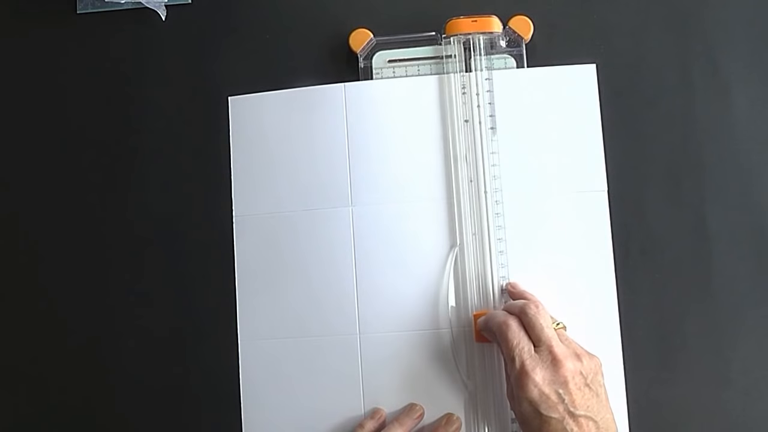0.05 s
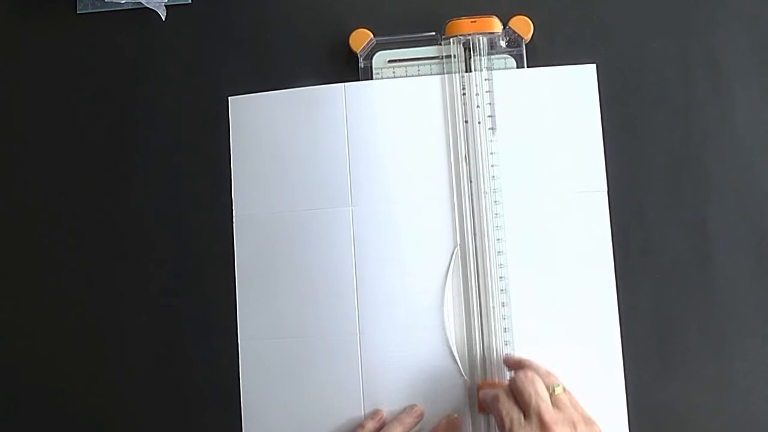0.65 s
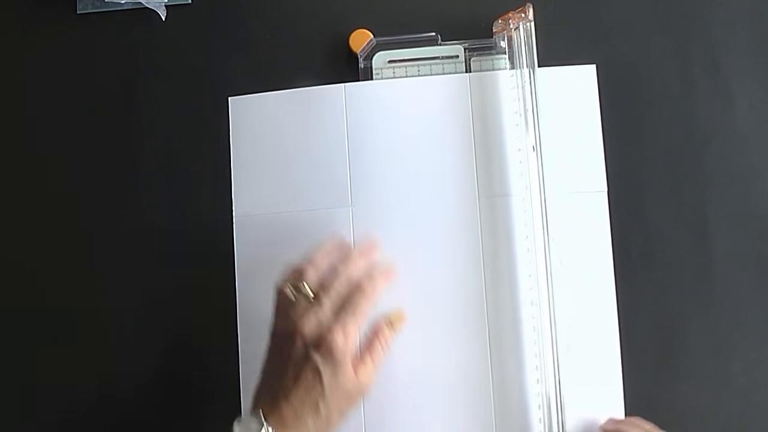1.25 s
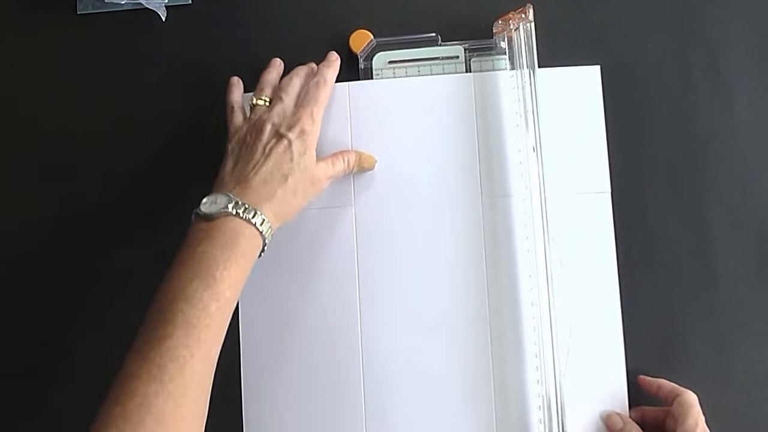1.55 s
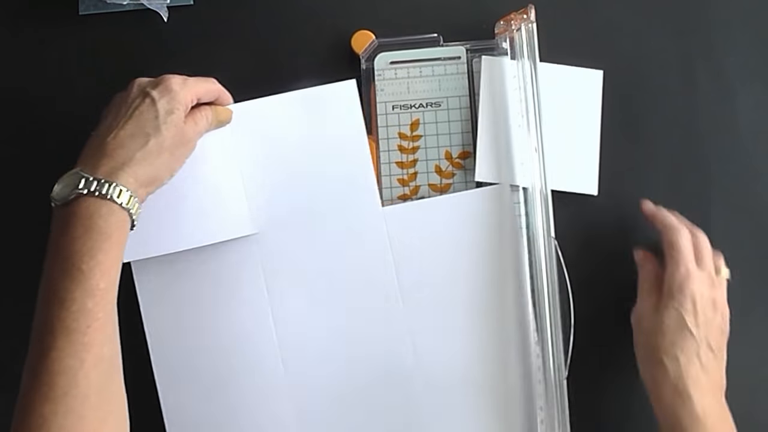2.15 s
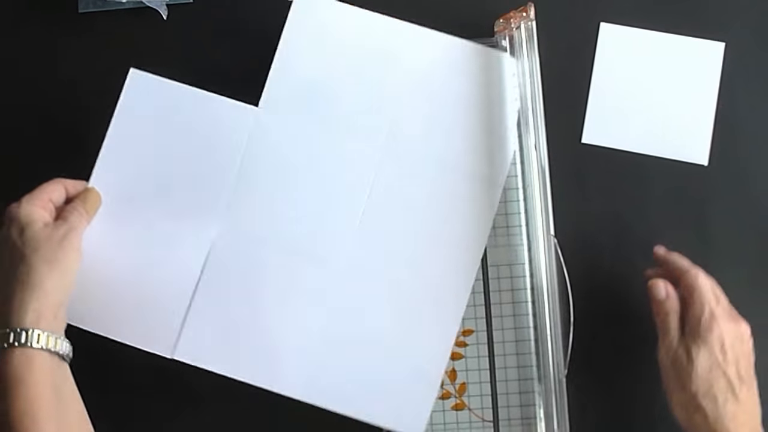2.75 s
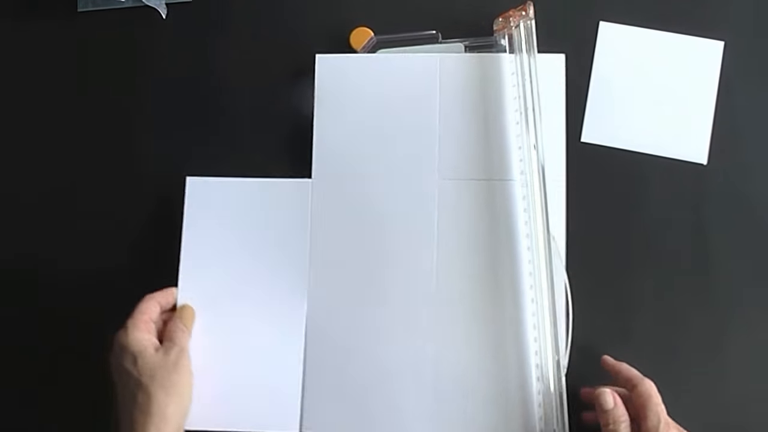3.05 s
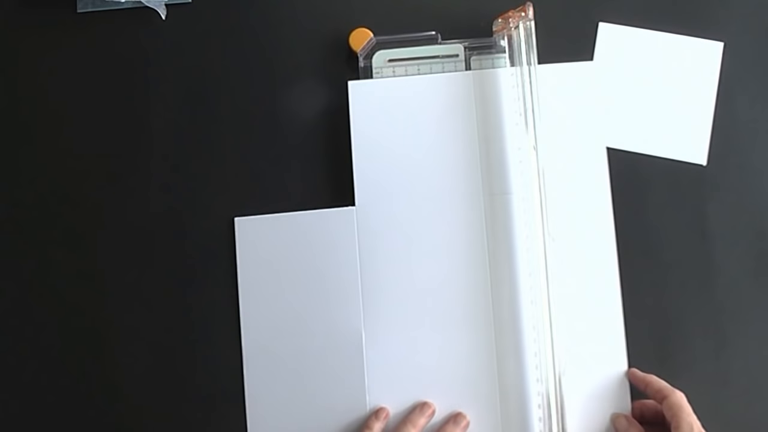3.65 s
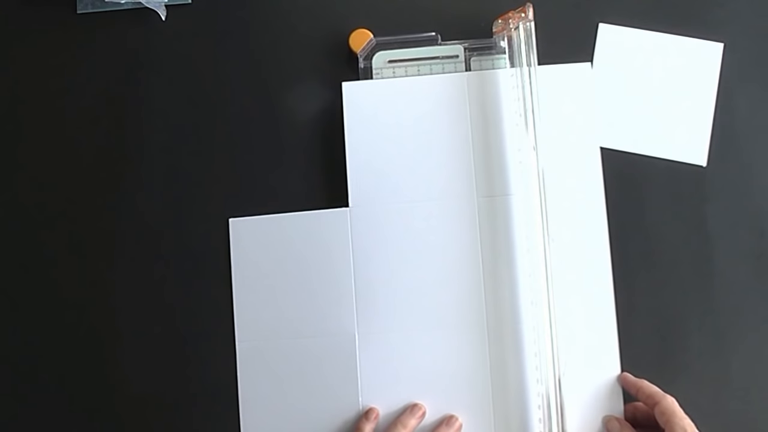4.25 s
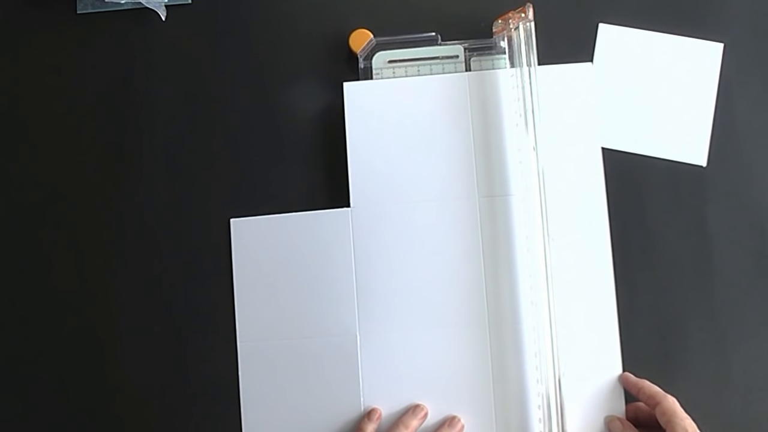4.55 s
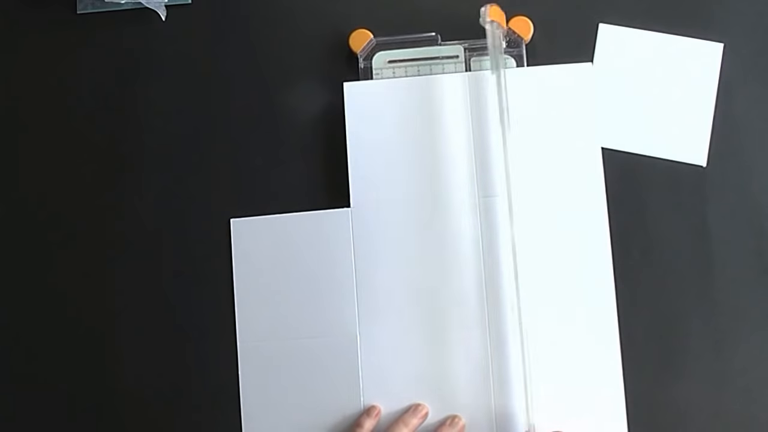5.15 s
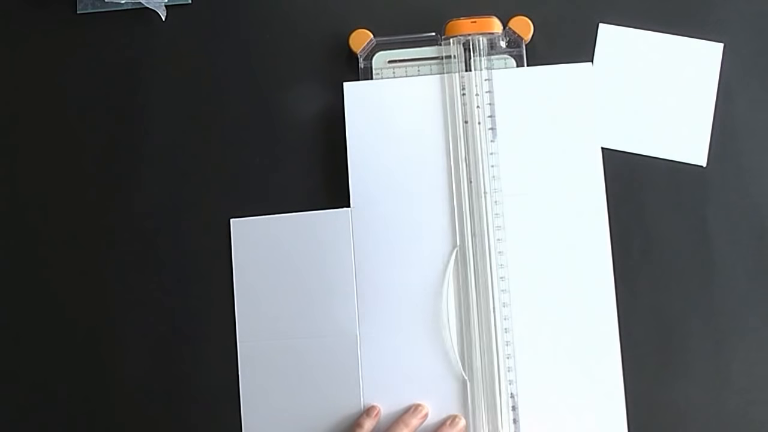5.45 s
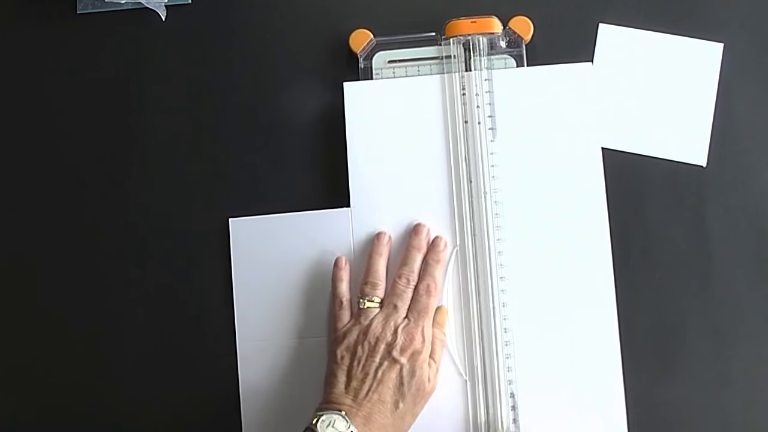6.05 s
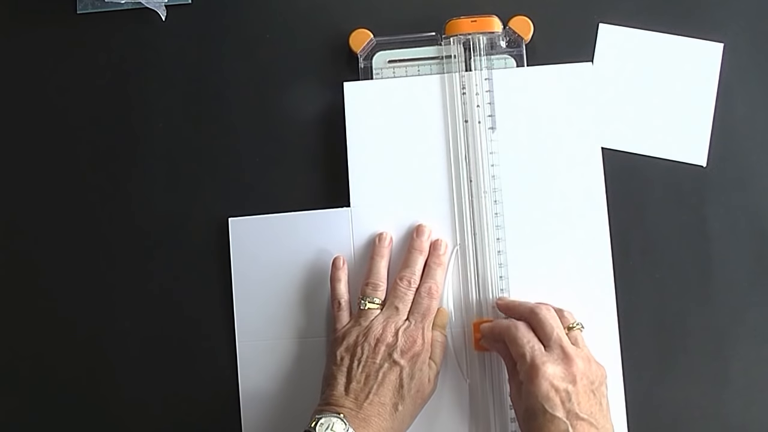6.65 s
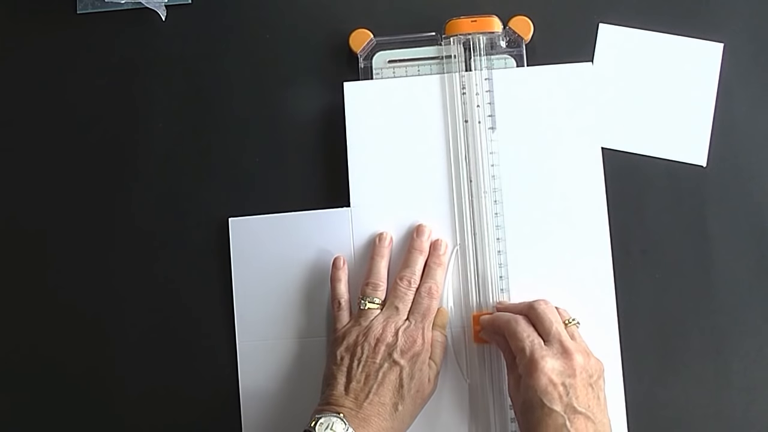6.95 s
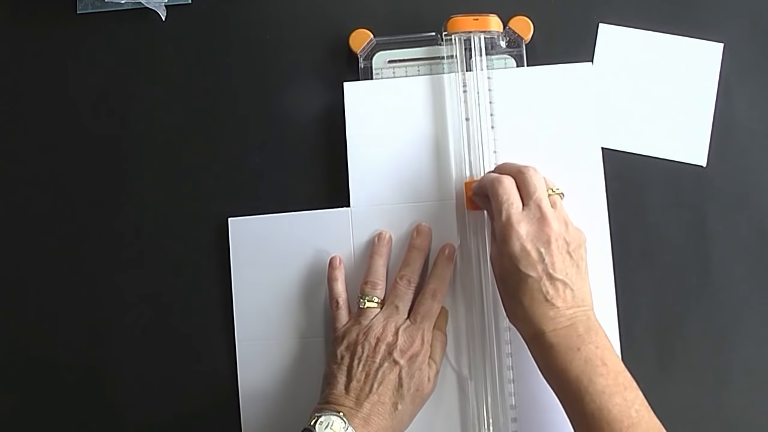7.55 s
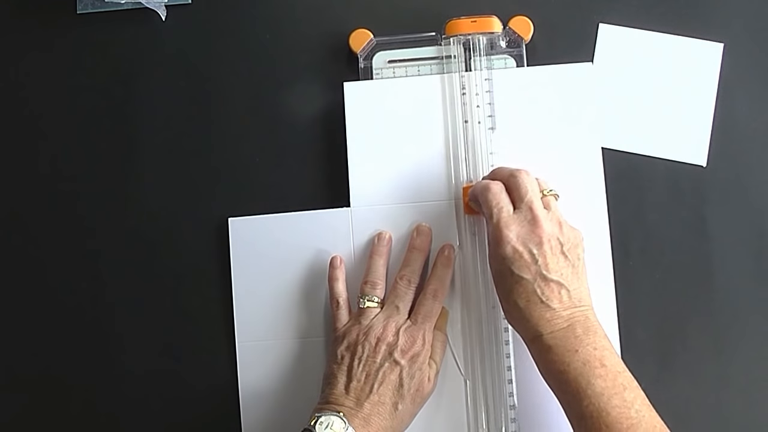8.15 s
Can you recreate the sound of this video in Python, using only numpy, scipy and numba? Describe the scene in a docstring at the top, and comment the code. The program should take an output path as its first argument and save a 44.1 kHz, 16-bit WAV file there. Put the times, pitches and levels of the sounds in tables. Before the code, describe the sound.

A plastic paper trimmer clacks and rasps through card twice, with the card rustling and slapping as it is turned between cuts.

```python
"""A plastic paper trimmer cutting card on a table in a small room, stereo microphone close overhead.
The rail clacks down, ringing the base, and the blade rasps through: snapping fibres hiss and shake the rail.
The rail is lifted; the card rubs, slaps and crackles as it is slid, flexed and turned. The rail shuts
again and a second cut follows in short strokes. Short reflections and faint room tone lie behind."""
import sys
import numpy as np
from scipy import signal
from scipy.fft import rfft, irfft
from scipy.io import wavfile
from scipy.ndimage import uniform_filter1d, map_coordinates
from numba import njit

SR = 44100
rng = np.random.default_rng(int(sys.argv[2]) if len(sys.argv) > 2 else 0)


def digitize_waveform(pressure):
    """Quantize a signal to 16-bit integers and store it at the path in sys.argv[1].

    Rows of a 2-D input are taken as channels; values are limited to [-1, 1].
    """
    field = np.atleast_2d(pressure).T
    bounded = np.clip(field, -1, 1)
    quanta = np.round(bounded * 32767).astype(np.int16)
    wavfile.write(sys.argv[1], SR, quanta)


N = 366471
TIME = np.arange(N) / SR
AGE = TIME[:SR // 3]  # seconds since a hit
THUD_BELOW_HZ = 350  # base modes below this thud, the rest ring

# modes of the trimmer's base: f/Hz, level/dB, t60/s
BASE_MODES = [(152, -16, 0.19), (239, -13.5, 0.21), (306, -12, 0.21), (405, -22, 0.1), (478, -11, 0.1),
              (580, 6, .058), (808, -8, .09), (1137, -10.5, 0.09), (1245, -22, .12), (1495, -28, 0.15),
              (1690, -29, 0.2), (2145, -26, 0.08)]
# spectrum of the card's body: f/Hz, level/dB
CARD_BODY = [(76, -59), (130, -19), (238, -6), (397, -10.5), (464, -2.5), (527, -18), (592, -5.5),
             (816, 1.5), (964, -7), (1280, -5.5), (1900, -14.5), (2150, -12), (2700, -24), (3640, -72),
             (6160, -120)]
# spectrum of the card's surface: f/Hz, level/dB
CARD_HISS = [(300, -38), (1410, -10), (2400, -4.5), (2680, -7), (4150, 0.5), (5750, -3.5), (7900, -5.5),
             (9500, -9.5), (11700, -13), (15100, -24)]


def blade():
    """Fibres part in dense snaps that hiss and shake the rail; snagging bundles make the rasp pulse."""
    # resonances of the rail: f/Hz, width/Hz, level/dB
    rail_modes = [(233, 26.6, -5), (403, 120, -13), (613, 47.6, 2.5), (807, 112, -3), (1654, 140, -7),
                  (2158, 68, -7.5)]
    # spectrum of parting fibres: f/Hz, level/dB
    fibre_spectrum = [(1290, -33.5), (2200, -3.5), (2490, -7), (2970, -7), (3390, -2.5), (4610, -1),
                      (5000, -1), (7150, -5.5), (8510, -8.5), (9560, -10.5), (10700, -12), (14800, -19),
                      (16000, -46.5)]
    # resonances of the thin blade: f/Hz, width/Hz, gain over the plain hiss
    blade_song = [(5300, 500, .7), (8400, 500, .8), (10900, 700, 1.6)]
    slow_hz, fast_hz, snag_s = 1080, 1430, 0.0037
    rasp, hiss, speed = strokes()
    snaps = grains(per_s=9000, spread_db=-0.2)
    snags = signal.oaconvolve(slips(per_s=55, uneven=.6), np.exp(-AGE / snag_s))[:N]
    drag = unit(snaps * (1 + undb(-1.5) * snags))
    rail = sum((-1) ** k * undb(db) * resonate(drag, hz, width)
               for k, (hz, width, db) in enumerate(rail_modes))
    whirr = glide(drag, slow_hz + (fast_hz - slow_hz) * speed, width=150.)  # card round the blade
    rail = colour(rail + undb(2) * whirr, [(70, -7), (150, 0), (2100, -12.5), (2700, -17), (8000, -39)])
    fibres = colour(snaps + .5 * drag, fibre_spectrum)
    song = sum(gain * glide(fibres, hz * (1 + 0.037 * walk(11)), float(width))
               for hz, width, gain in blade_song)  # the pitches wander as the blade flexes
    return undb(-0.7) * rasp * unit(rail) + undb(1.5) * hiss * flutter(fibres + song, rate=39)


def strokes():
    """Gains of rasp and hiss, and blade speed 0-1: each stroke swells towards its fast middle."""
    # blade strokes: t/s, attack/s, hold/s, release/s, rasp/dB, hiss/dB
    cuts = [(0.532, 0.048, 0.26, 0.049, -35, -43), (6.191, 0.021, 0.24, 0.15, -34, -41),
            (6.643, .12, 0.016, 0.12, -45.5, -52), (6.868, 0.12, .01, 0.058, -59.5, -61.5),
            (7.268, 0.17, 0.13, 0.09, -48.5, -56), (7.694, 0.023, 0.022, .02, -51, -63.5)]
    rasp_swell_db, hiss_swell_db = 5, 6
    rasp = hiss = speed = 0
    for start, attack, hold, release, rasp_db, hiss_db in cuts:
        moving = push(start, attack, hold, release)
        off_middle = np.minimum((2 * (TIME - start) / (attack + hold + release) - 1) ** 2, 1)
        rasp = rasp + moving * undb(rasp_db - rasp_swell_db * off_middle)
        hiss = hiss + moving * undb(hiss_db - hiss_swell_db * off_middle)
        speed = np.maximum(speed, 1 - off_middle)
    return rasp, hiss, speed


def knocks():
    """Plastic on plastic: a tick, a clack, a thud and the base's ring, which hard blows bring out most."""
    # blows on the trimmer: t/s, level/dB, tick offset/dB, part
    hits = [(0.293, -33, -12, "slider"), (0.362, -40, -11, "slider"), (0.4253, -17.5, -15, "slider"),
            (0.469, -6.5, -16, "blade"), (0.863, -23, -6, "carriage"), (1.009, -28, -11.5, "carriage"),
            (1.023, -33.5, -4, "carriage"), (1.074, -33, -16.5, "base"), (1.223, -33.5, -18, "base"),
            (3.718, -36, -20.5, "base"), (5.137, -34.5, -17, "hinge"), (5.163, -35.5, -23, "hinge"),
            (5.268, -42, -17, "base"), (5.370, -32.5, -7, "latch"), (5.384, -28, 2.5, "latch"),
            (5.409, -30, -25, "hinge"), (5.427, -28, -14, "hinge"), (5.444, -31, -14, "hinge"),
            (5.482, -37, -14, "hinge"), (5.525, -28.5, 0, "feet"), (6.065, -39.5, -7, "carriage"),
            (7.184, -33.5, -8.5, "latch"), (7.202, -35, -15, "base"), (7.229, -30.5, -10.5, "carriage"),
            (7.269, -28.5, -16, "bed"), (7.748, -34, -3.5, "carriage"), (8.252, -36, -27, "slider")]
    # per struck part: thud offset/dB, thud f/Hz, share of thud ring time the hands leave, tick f/Hz
    parts = {"slider": (-30, 225, .6, 4870), "blade": (-19, 195, .7, 5200),
             "carriage": (-12.5, 190, .75, 5600), "latch": (-10, 230, .7, 4000),
             "hinge": (-6, 295, .7, 4800), "base": (-11, 195, .7, 4000), "bed": (-2.5, 208, .85, 3400),
             "feet": (-8, 175, .7, 6000)}
    # spectrum of clacking plastic: f/Hz, level/dB
    clack_spectrum = [(160, -30), (280, -1), (462, -10.5), (666, 3), (980, -4.5), (1090, -0.5),
                      (1310, -2.5), (1590, -10.5), (2120, -16), (2400, -37), (2800, -19.5), (3640, -75.5),
                      (6160, -120)]
    upper_modes = [mode for mode in BASE_MODES if mode[0] >= THUD_BELOW_HZ]
    out = np.zeros(N)
    for s, db, tick_db, part in hits:
        thud_db, thud_hz, ring_share, tick_hz = parts[part]
        force = np.clip((db + 24.5) / 20, .25, .95)
        base = highpass(ring(upper_modes, scatter_db=4, ring_share=.78), hz=255)
        clack = burst(clack_spectrum, t60=0.039, tail_db=-4.5, tail_t60=.16)
        body = np.sqrt(force) * blow(base, db - 4.5) + np.sqrt(1 - force) * blow(clack, db - 4.5)
        add(out, s, body + tick(db + tick_db, tick_hz))
        add(out, s, thud(db + thud_db + 3.5, thud_hz, swell_s=0.015, ring_share=ring_share))
    return out


def tick(db, hz):
    """A hard snap pings the rail, favouring the modes near hz; a softer touch is duller."""
    # modes of the rail's thin plastic: f/Hz, level/dB, t60/s
    pings = [(3810, -3, .04), (4600, 0, .04), (5360, -2, .035), (6380, -1, .03), (7020, -1, .03),
             (8250, -5, .025), (11000, -5, .02)]
    # spectrum of the snap: f/Hz, level/dB
    snap_spectrum = [(1180, -36), (2000, -6), (2550, -13), (3810, -3.5), (6530, -8), (9490, -14),
                     (11200, -17.5), (14900, -31.5), (16000, -39.5)]
    contact_s = .00025
    modes = [(f, level - 7 * abs(np.log2(f / hz)), t60) for f, level, t60 in pings]
    snap = burst(snap_spectrum, t60=.0055, tail_db=-19, tail_t60=0.14)
    snap = blow(snap + 1.2 * resonate(snap, hz, width=700), db=0)
    ping = blow(ring(modes, scatter_db=3.5, ring_share=0.99), db=-8)
    hit = (snap + ping) * (1 - np.exp(-AGE / contact_s))
    cutoff_hz = np.clip(9000 * 2 ** ((db + 41.5) / 18), 3500, 19000)
    return blow(signal.sosfilt(signal.butter(2, cutoff_hz, fs=SR, output="sos"), hit), db)


def thud(db, hz, swell_s, ring_share):
    """The base's low modes take a moment to get going; the place of the blow favours those near hz."""
    modes = [(f, level - 19 * abs(np.log2(f / hz)), t60)
             for f, level, t60 in BASE_MODES if f < THUD_BELOW_HZ]
    low = ring(modes, scatter_db=2, ring_share=ring_share)
    low = highpass(low * (1 - np.exp(-AGE / swell_s)), hz=95)
    return low * undb(db) / np.abs(low).max()


def card_flaps():
    """Card is well damped: a papery slap and a crackle, with a thud from the base under it."""
    # slaps of the sheet: t/s, level/dB, crackle offset/dB, touch
    slaps = [(1.108, -39, -34, "land"), (1.628, -28, -21.5, "land"), (1.687, -30, -38, "land"),
             (1.86, -21.5, -20, "land"), (1.979, -23.5, -16.5, "flex"), (2.32, -35, -18, "land"),
             (2.3752, -31, -9, "flex"), (2.3798, -22.5, -4, "flex"), (2.391, -26, -4, "land"),
             (2.41, -27.5, -0.5, "flex"), (2.425, -35, 6, "flex"), (2.465, -24, -17, "flex"),
             (2.846, -35.5, -15, "land"), (2.889, -20, -18.5, "land"), (2.902, -30, -16, "land"),
             (2.938, -27, -12, "land"), (3.032, -41.5, -0.5, "flex"), (3.106, -33.5, -8.5, "flex"),
             (3.155, -41.5, -19, "pat"), (3.225, -38, -12, "flex"), (3.244, -35, -10, "land"),
             (3.299, -50, -20, "flex"), (3.32, -44, -16, "flex"), (3.487, -41, -11, "land"),
             (4.007, -47.5, -28, "land"), (4.886, -47, -12.5, "pat"), (5.637, -37.5, -39, "land"),
             (7.437, -35, -37, "land")]
    # per touch (flexed in the air, landing, patted): thud offset/dB, slap f/Hz
    touches = {"flex": (-37, 1500), "land": (-19.5, 560), "pat": (4.4, 650)}
    out = np.zeros(N)
    for s, db, crackle_db, touch in slaps:
        thud_db, slap_hz = touches[touch]
        landing = 1 - np.exp(-AGE / 0.00014)  # a limp sheet lands bit by bit
        slap = landing * burst(CARD_BODY, t60=0.068, tail_db=-9.5, tail_t60=0.22)
        slap = slap + 1.16 * resonate(slap, slap_hz, width=960)
        crackle = burst(CARD_HISS, t60=0.01, tail_db=-11.5, tail_t60=0.16)
        add(out, s, blow(slap, db - 8) + blow(crackle, db + crackle_db - 2))
        add(out, s, thud(db + thud_db, hz=202, swell_s=0.0012, ring_share=0.73))
    return out


def card_slides():
    """The sheet catches and slips: its body rumbles, its surface hisses, a skimming edge swishes."""
    # shoves of the card over the base: t/s, speeding up/s, slowing down/s, rub/dB, hiss/dB
    slides = [(0.995, 0.0027, 0.55, -45.5, -60), (1.17, 0.075, 0.14, -43, -51.5),
              (1.52, 0.3, 0.16, -46, -51), (1.92, 0.078, 0.041, -41.5, -47.5), (1.98, 0.067, 1, -54, -59.5),
              (2.37, 0.03, 0.17, -40, -40), (2.5, 0.047, 0.24, -47, -50.5),
              (2.835, 0.031, 0.21, -45, -53.5), (3.0, 0.11, 0.35, -50, -59), (3.37, 0.15, 0.26, -54, -56),
              (3.78, 0.11, 0.066, -58.5, -67), (5.355, 0.037, 0.23, -40.5, -57),
              (7.17, 0.057, 0.072, -44, -54.5), (8.215, 0.031, .07, -51.5, -57.5)]
    # the cut square skimming the table on its edge: t/s, speeding up/s, slowing down/s, level/dB
    skims = [(2.17, 0.024, 0.027, -42.5), (2.372, 0.068, 0.11, -33.5), (2.46, 0.093, 0.066, -39),
             (2.66, 0.044, 0.18, -50.5)]
    # spectrum of that edge: f/Hz, level/dB
    swish_spectrum = [(1200, -45), (2940, -28), (5000, -3.5), (5900, -2), (8920, -2), (9880, -3),
                      (11500, -3), (15000, -15), (16000, -33)]
    rub, hiss = shoves(slides)
    edge, = shoves(skims)
    catches = grains(per_s=1800, spread_db=-1) * undb(4 * walk(45))
    surface = grains(per_s=9200, spread_db=-1) * undb(3.2 * walk(77))
    body = colour(catches, CARD_BODY)
    body = flutter(body + .5 * resonate(body, hz=1500, width=120), rate=12)
    rustle = flutter(colour(surface + 0.27 * catches, CARD_HISS), rate=28)
    crinkles = grains(per_s=140, spread_db=4)
    swish = colour(grains(per_s=8000, spread_db=0.5) + 0.27 * crinkles, swish_spectrum)
    rustle = rustle + 0.12 * unit(colour(crinkles, CARD_HISS))
    return rub * body + undb(1.5) * hiss * rustle + undb(-3) * edge * unit(swish)


def card_sweeps():
    """Turning the sheet drags its broad face over the table with a hollow swish."""
    # turns of the sheet: t/s, speeding up/s, slowing down/s, level/dB
    turns = [(2.52, 0.061, 0.06, -45.5), (3.03, 0.051, 0.074, -55)]
    level, = shoves(turns)
    rub = resonate(grains(per_s=3300, spread_db=-2), hz=1700, width=550)
    return level * unit(resonate(rub, hz=1700, width=1100))


def drags():
    """Skin and hinge stick and let go at an uneven rate, shaking the base with a dull judder."""
    # drags of fingers and rail hinge: t/s, speeding up/s, slowing down/s, level/dB
    moves = [(1.54, 0.052, 0.27, -43), (5.132, 0.011, 0.11, -36.5), (5.77, 0.046, 0.069, -43.5),
             (5.86, 0.036, 0.079, -46.5), (8.18, 0.046, 0.067, -44)]
    # spectrum of the judder: f/Hz, level/dB
    judder_spectrum = [(88, -37), (150, -5), (297, -2.5), (504, -3.5), (701, 2), (877, -7), (1080, -5),
                       (1420, -16.5), (1720, -20), (2500, -47), (3250, -69), (5500, -120)]
    level, = shoves(moves)
    judder = unit(slips(per_s=120, uneven=.43)) + 2 * grains(per_s=1800, spread_db=0.5)
    return undb(-2.5) * level * unit(colour(judder, judder_spectrum))


def room(x, t60, wet_db, side_db):
    """Short reflections off table and walls; left and right differ most in the treble."""
    tails = rng.standard_normal((2, len(AGE))) * fade(t60) * (AGE > .004)
    centre, side = (signal.fftconvolve(x, h / np.linalg.norm(h))[:N] for h in tails)
    side = colour(side, [(150, 2.5), (500, -3.5), (1200, 1), (5000, -0.5), (8000, 1), (14000, 8)])
    return x + undb(wet_db) * centre + undb(side_db) * np.array([side, -side])


def room_tone(db, side_db):
    """The room's faint steady rumble and hiss, spread between left and right."""
    # spectrum of the quiet room: f/Hz, level/dB
    spectrum = [(15, -30), (30, -7), (70, -3), (105, 2), (145, -4), (200, -1), (350, -4.5), (405, 1),
                (480, -8), (650, -8.5), (900, -13), (1500, -14.5), (2700, -23), (4000, -21), (6500, -21),
                (8500, -23.5), (11000, -20.5), (14800, -25), (16000, -34)]
    mid, side = (unit(colour(rng.standard_normal(N), spectrum)) for _ in range(2))
    side = colour(side, [(30, -3), (100, -4), (250, 1), (1000, 6), (4000, -2), (12000, -8)])
    return undb(db) * (mid + undb(side_db) * np.array([side, -side]))


def push(start, attack, hold, release):
    """Gain of rubbing under a hand that gathers speed, holds it and comes to rest."""
    corners = np.cumsum([0, attack, hold, release])
    speed = np.interp(TIME - start, corners, [0, 1, 1, 0])
    return speed ** 0.96


def shoves(rows):
    """One gain curve per level column, for movements that slow as soon as they are up to speed."""
    return np.sqrt(sum(np.outer(undb(db), push(start, rise, 0, fall)) ** 2
                       for start, rise, fall, *db in rows))


def grains(per_s, spread_db):
    """Random tiny slips of uneven size, rms 1."""
    hit = rng.random(N) < per_s / SR
    size, strength = rng.standard_normal(N), rng.exponential(size=N)
    return unit(hit * size * undb(spread_db * np.minimum(strength, 4)))


def slips(per_s, uneven):
    """One pulse each time a sticking contact lets go, at an uneven rate."""
    cycles = np.floor(np.cumsum(per_s * np.exp(uneven * walk(70))) / SR)
    return np.diff(cycles, prepend=0) * undb(4.4 * walk(120))


def flutter(x, rate):
    """The contact keeps moving, so each narrow band swells and fades on its own."""
    depth_db, bands_per_octave = 3.5, 5
    hz, s, spectrum = signal.stft(x, SR, nperseg=512)
    band = bands_per_octave * np.log2(np.maximum(hz / 400, 1))
    chance = rng.standard_normal((int(s[-1] * rate) + 2, int(band[-1]) + 2)).T
    swell = map_coordinates(chance, np.meshgrid(band, s * rate, indexing="ij"), order=1)
    return unit(signal.istft(spectrum * undb(depth_db * swell), SR)[1][:N])


def ring(modes, scatter_db, ring_share):
    """Struck modes, slightly detuned; each blow lands elsewhere and weights them anew."""
    chance = rng.standard_normal((len(modes), 2))
    return sum(undb(db + scatter_db * weight) * fade(t60 * ring_share)
               * np.sin(2 * np.pi * hz * (1 + 0.0077 * detune) * AGE)
               for (hz, db, t60), (detune, weight) in zip(modes, chance))


def burst(points, t60, tail_db, tail_t60):
    """A short crack of contact noise and the weaker, ragged chatter after it."""
    chatter = np.repeat(undb(3.5 * rng.standard_normal(len(AGE) // 100 + 1)), 100)[:len(AGE)]
    envelope = fade(t60) + undb(tail_db) * chatter * fade(tail_t60)
    return colour(rng.standard_normal(len(AGE)) * envelope, points)


def colour(x, points):
    """Causal filter with the given (f/Hz, level/dB) spectrum."""
    size = 2048
    hz, db = np.transpose(points)
    bins = np.maximum(np.fft.rfftfreq(size, 1 / SR), 1)
    cepstrum = irfft(np.log(undb(np.interp(np.log(bins), np.log(hz), db))))
    cepstrum[1:size // 2] *= 2  # fold to minimum phase
    cepstrum[size // 2 + 1:] = 0
    return signal.oaconvolve(x, irfft(np.exp(rfft(cepstrum))))[:len(x)]


def resonate(x, hz, width):
    """One resonance, gain 1 at its centre, width in Hz."""
    return signal.lfilter(*signal.iirpeak(hz, hz / width, fs=SR), x)


@njit
def glide(x, hz, width):
    """One resonance whose centre moves, gain 1 at the centre."""
    y, band, low = np.empty(len(x)), 0., 0.
    for i in range(len(x)):
        g, k = np.tan(np.pi * hz[i] / SR), width / hz[i]
        v = (band + g * (x[i] - low)) / (1 + g * (g + k))
        band, low, y[i] = 2 * v - band, low + 2 * g * v, k * v
    return y


def highpass(x, hz):
    """A small object radiates little below this frequency."""
    return signal.sosfilt(signal.butter(3, hz, "high", fs=SR, output="sos"), x)


def walk(rate):
    """Smooth random wander, rms 1."""
    step = max(int(SR / rate), 1)
    stairs = np.repeat(rng.standard_normal(N // step + 1), step)
    return unit(uniform_filter1d(stairs, step)[:N])


def fade(t60):
    """Exponential decay, 60 dB down after t60 seconds."""
    return np.exp(-np.log(1000) * AGE / t60)


def blow(x, db):
    """Scale a hit so that its first 10 ms have this level."""
    return x * undb(db) / np.sqrt(np.mean(x[:SR // 100] ** 2))


def undb(db):
    """Gain of a level in dB."""
    return 10 ** (np.asarray(db) / 20)


def unit(x):
    """Scale to rms 1."""
    return x / np.sqrt(np.mean(x ** 2))


def add(track, s, sound):
    """Mix a sound into the track at time s."""
    start = max(int(s * SR), 0)
    track[start:start + len(sound)] += sound[:N - start]


def scene():
    """Trimmer and card close up and centred, the small room around them."""
    table = knocks() + card_flaps() + drags() + blade() + card_slides() + card_sweeps()
    return room(table, t60=0.35, wet_db=-11, side_db=-14.5) + room_tone(db=-62.3, side_db=3.5)


def record(dry):
    """Each microphone port colours the sound; the recorder rounds the hardest peak and cuts the top."""
    # left port minus right port: f/Hz, level/dB
    ports = [(250, -1.5), (700, 1.6), (4000, 0.5), (8000, -2), (12000, 1)]
    ceiling, top_hz = .85, 15700
    left = colour(dry[0], [(hz, db / 2) for hz, db in ports])
    right = colour(dry[1], [(hz, -db / 2) for hz, db in ports])
    rounded = ceiling * np.tanh(np.array([left, right]) / ceiling)
    return signal.sosfilt(signal.ellip(10, .2, 70, top_hz, fs=SR, output="sos"), rounded)


dry = scene()
out = record(dry)
digitize_waveform(out)
```